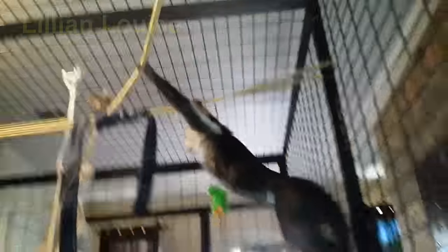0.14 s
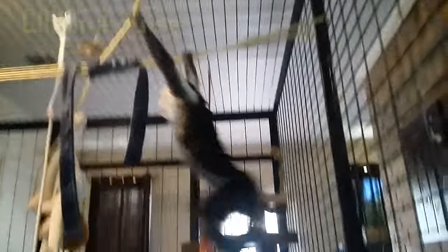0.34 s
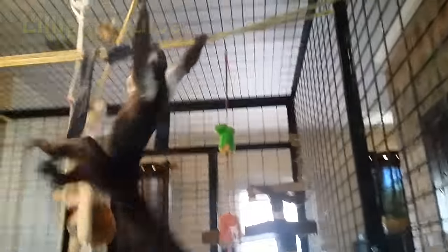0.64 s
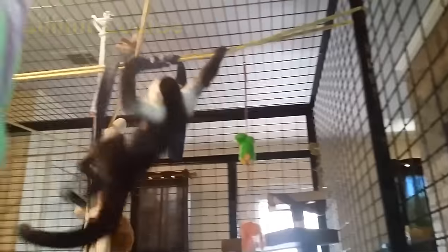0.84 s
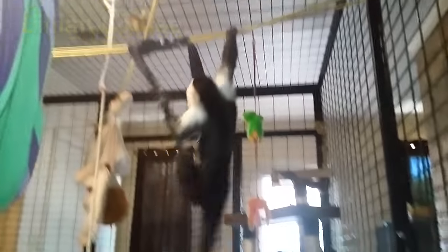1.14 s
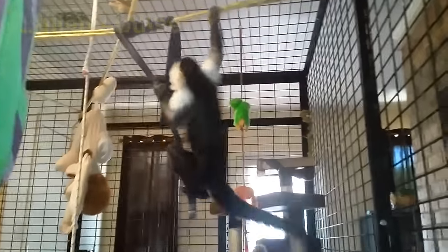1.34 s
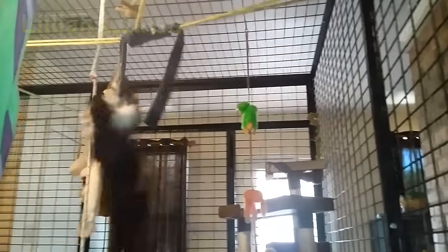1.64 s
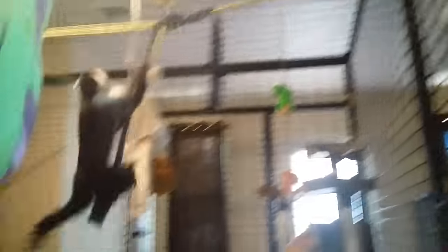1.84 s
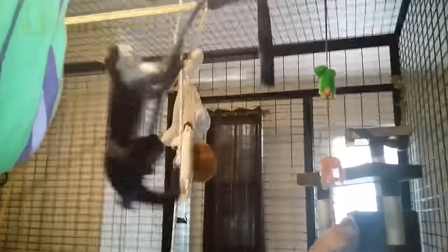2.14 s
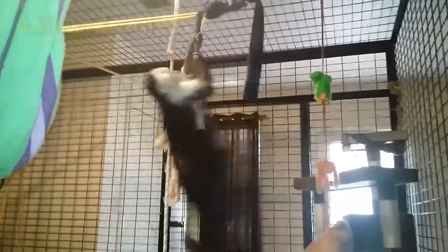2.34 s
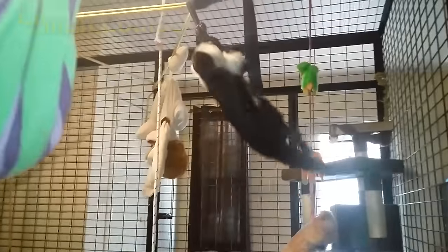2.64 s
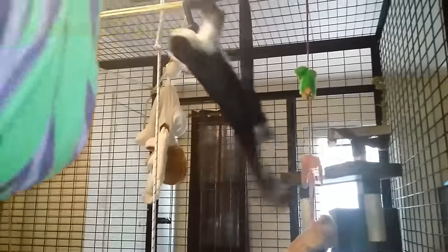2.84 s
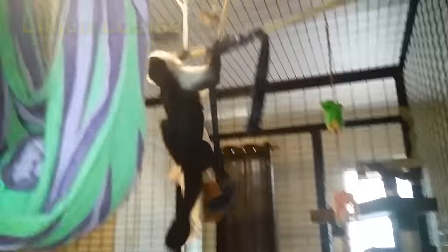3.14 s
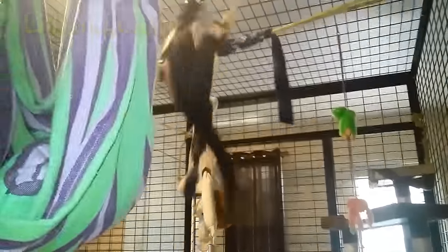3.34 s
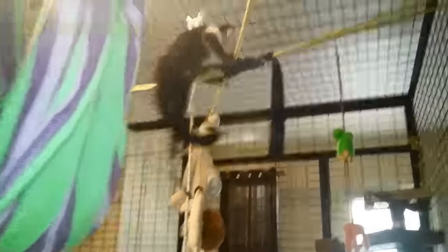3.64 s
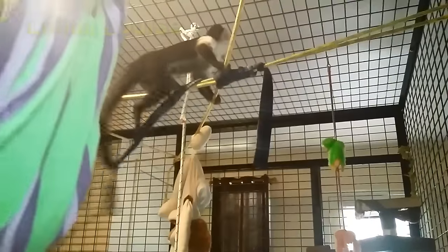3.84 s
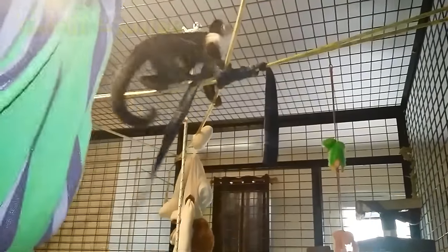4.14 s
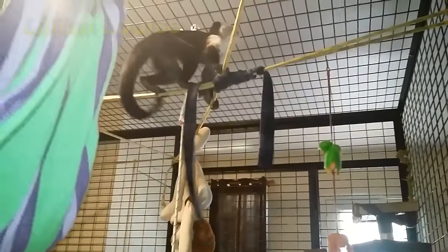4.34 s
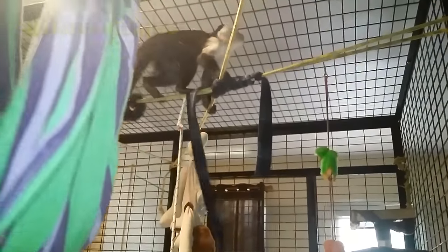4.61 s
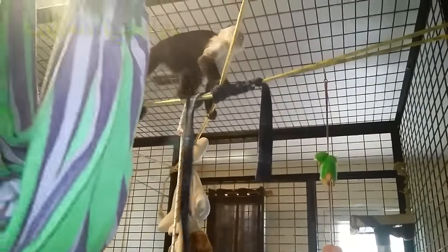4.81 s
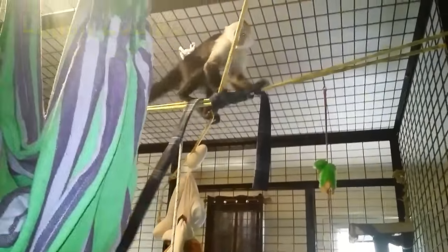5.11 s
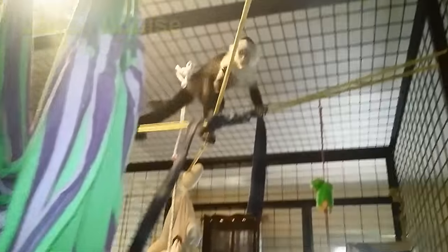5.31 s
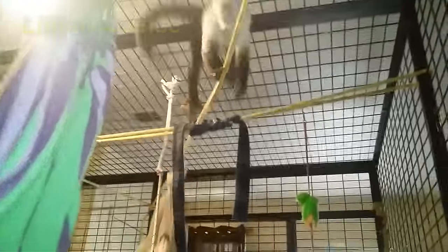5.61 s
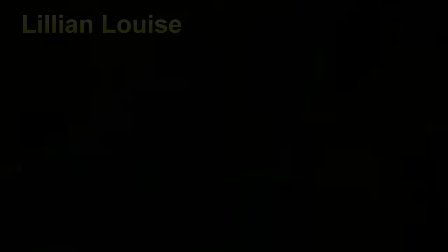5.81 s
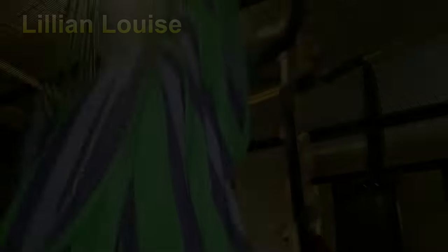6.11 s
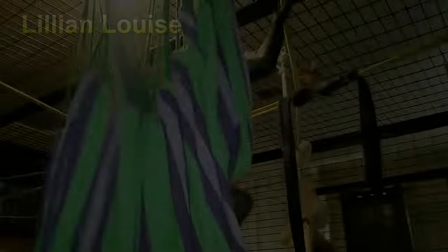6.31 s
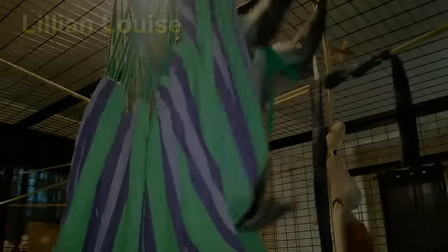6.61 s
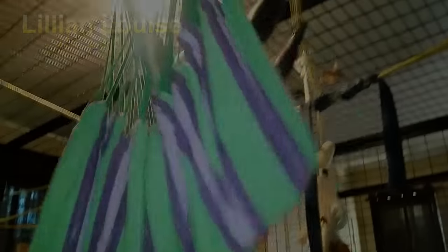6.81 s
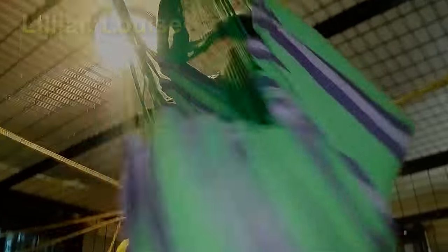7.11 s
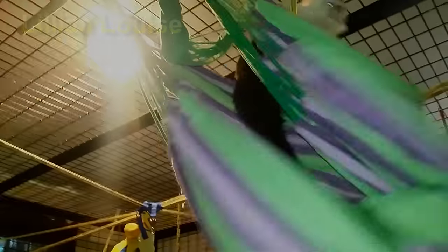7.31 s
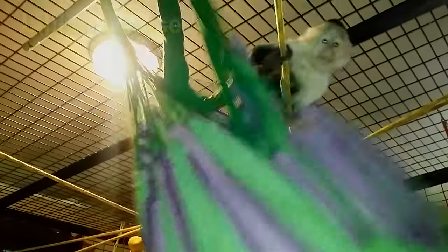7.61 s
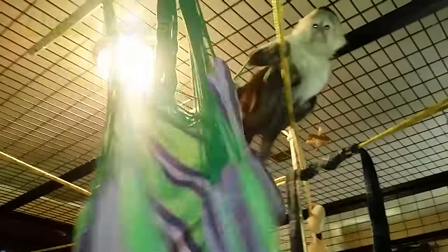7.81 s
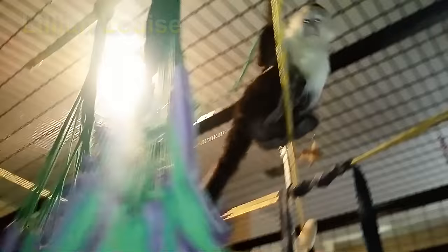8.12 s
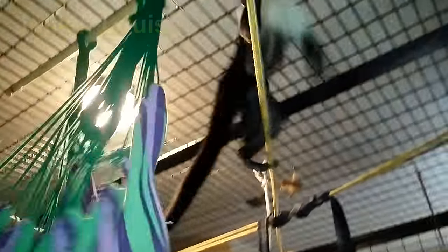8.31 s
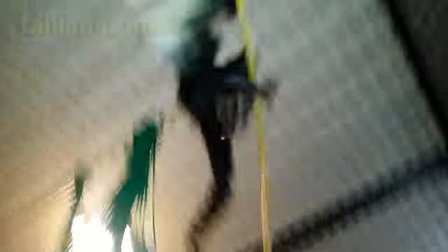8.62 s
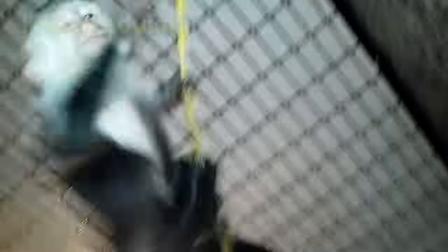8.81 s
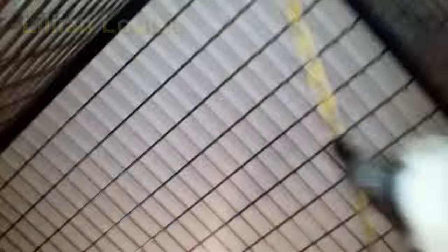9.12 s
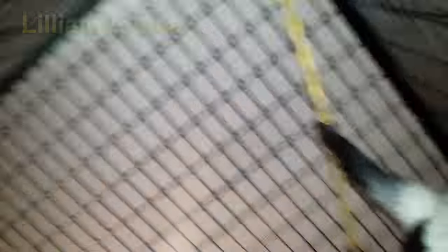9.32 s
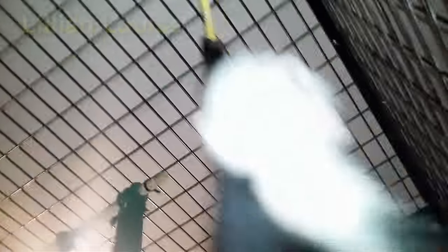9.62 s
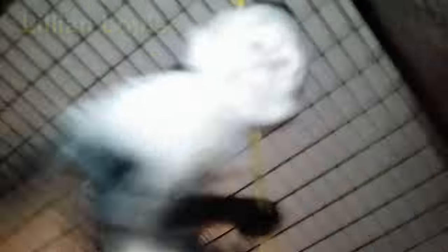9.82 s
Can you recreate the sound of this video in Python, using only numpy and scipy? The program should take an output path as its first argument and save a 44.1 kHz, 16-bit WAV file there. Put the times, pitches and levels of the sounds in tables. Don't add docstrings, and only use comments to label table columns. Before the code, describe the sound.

Over faint low hum in a hard-walled room, a hand-held phone catches a faint snap and a soft brush at 0.1 s. From about 0.65 s a small monkey twitters in short high gliding chirps, with breathy peeps near 1.1 and 1.5 s, while feet scrape mesh. Soft woody thumps cluster from 1.5 to 3.2 s; bright, partly screechy calls peak around 2.4-2.6 s. Quiet peeps lead to the heaviest low thud at 3.75 s. More chirps follow at 4-4.9 s, then hard metallic panel rattles at 5 and 5.6 s. Twittering resumes at 6-6.9 s, peeps and whistles at 7-8.2 s, with a click near 7.7 s. Mesh shakes hard at 8.3 s and more weakly at 8.6 s under a rising peep. Jolts, wire brushes, handling rumble, thumps and a double tick around 9 s precede last chirps and a flurry of snaps at 9.93 s. Short reverberant tails are gated.

```python
import sys
import numpy as np
from scipy import signal
from scipy.io import wavfile
from scipy.ndimage import uniform_filter1d

SR = 44100
rng = np.random.default_rng(int(sys.argv[2]) if len(sys.argv) > 2 else 0)


def inscribe(sig):
    pcm = np.round(np.clip(np.atleast_2d(sig).T, -1, 1) * 32767)
    wavfile.write(sys.argv[1], SR, pcm.astype(np.int16))


def makeup_ratio(level_db):
    decades = np.asarray(level_db, float) / 20
    return 10 ** decades


N = 438787

# t/s, rise/s
SHAKE_STARTS = [(4.99, .04), (5.627, .048), (8.326, .042), (8.625, .07)]
# t/s, f/Hz, width/Hz, relative level/dB
SHAKEN_WIRES = [
    (4.9, 4910, 900, 2.5),
    (5.5, 4130, 1200, -3),
    (8.2, 6440, 1000, 5.5),
]


def rms_one(x):
    return x / np.sqrt(np.mean(x ** 2) + 1e-20)


def in_time(tables):
    t, rows = np.arange(N) / SR, np.concatenate(tables)
    on = np.zeros(N)
    for table in tables:
        start, end = table[0][0], table[-1][0]
        on += np.interp(t, [start - .006, start, end, end + .03], [0, 1, 1, 0])
    return [np.interp(t, rows[:, 0], column) for column in rows.T[1:]] + [on]


def at_hz(points, hz):
    points = np.array(points)
    return np.interp(np.log(hz), np.log(points[:, 0]), points[:, 1])


def drift(hz):
    settle = 9000
    r = np.exp(-2 * np.pi * hz / SR)
    noise = rng.standard_normal(N + settle)
    return rms_one(signal.lfilter([1], [1, -2 * r, r * r], noise)[settle:])


def highpass(x, order, hz):
    return signal.sosfilt(signal.butter(order, hz, "high", fs=SR, output="sos"), x)


def resonate(x, hz, width_hz):
    r = np.exp(-np.pi * width_hz / SR)
    poles = [1, -2 * r * np.cos(2 * np.pi * hz / SR), r * r]
    return signal.lfilter([(1 - r * r) / 2, 0, (r * r - 1) / 2], poles, x + 1e-18)


def through(hits, modes):
    out = 0
    for k, (hz, width, db) in enumerate(modes):
        once = resonate(hits, hz, width)
        out = out + (-1) ** k * makeup_ratio(db) * resonate(once, hz, 1.22 * width)
    return rms_one(out)


def hum():
    # f/Hz, level/dB per Hz
    spectrum = [(26, -28), (37, -23.5), (55, 6), (85, -4.5), (210, -4.5), (300, -8), (500, -12),
                (16000, -30)]
    # f/Hz, coefficient/1
    likeness = [(30, -0.65), (70, -0.64), (260, 0.77), (700, -0.014), (1400, 0.57), (9000, -0.25)]
    out, edges = 0, 22 * 2 ** np.arange(0, 9.6, .5)
    white = rng.standard_normal((2, 2, N))
    for k, (low, high) in enumerate(zip(edges, edges[1:])):
        band = signal.butter(2, [low, high], "band", fs=SR, output="sos")
        mid, side = signal.sosfilt(band, white[k % 2])
        hz = np.sqrt(low * high)
        alike = np.clip(at_hz(likeness, hz), -1, 1)
        stereo = np.sqrt(1 + alike) * mid + np.sqrt(1 - alike) * side * [[1], [-1]]
        out = out + makeup_ratio(at_hz(spectrum, hz)) * stereo
    return rms_one(out)


def jostle():
    # t/s, length/s, level/dB
    movements = [
        (.0, 0.13, -73),
        (2.077, 0.57, -61),
        (4.963, 0.31, -61),
        (7.62, 0.41, -64),
        (8.91, 0.5, -57.5),
        (9.877, 0.037, -61.5),
    ]
    t, swell = np.arange(N) / SR, np.zeros(N)
    for s, length, db in movements:
        swell += makeup_ratio(db) * np.sin(np.pi * np.clip((t - s) / length, 0, 1))
    band = signal.butter(3, [125, 340], "band", fs=SR, output="sos")
    mid, side = signal.sosfilt(band, rng.standard_normal((2, N)))
    return swell * makeup_ratio(4 * drift(14)) * rms_one(mid + .55 * side * [[1], [-1]])


def room(x, direct_db, wet_db):
    t60_s, build_s, port_delay = .24, 0.0021, 16
    t = np.arange(SR // 2) / SR
    tail = rng.standard_normal((2, len(t))) * makeup_ratio(-60 * t / t60_s) * np.minimum(t / build_s, 1)
    tail *= makeup_ratio(wet_db) / np.sqrt(np.sum(tail ** 2, axis=1, keepdims=True))
    tail[0, 0] += makeup_ratio(direct_db)
    tail[1, port_delay] += makeup_ratio(direct_db)
    return signal.fftconvolve(x[None], tail, axes=1)[:, :N]


def thumps():
    # t/s, peak level/dB, pitch f/Hz, knock relative level/dB, knock f/Hz
    blows = [(0.719, -62.5, 225, 0.5, 700), (1.468, -46, 238, -38, 600), (1.713, -48, 156, -9, 920),
             (1.801, -51.5, 150, 0, 990), (1.93, -59, 212, 0, 940), (2.031, -51, 228, -12, 890),
             (2.144, -50, 303, -11, 620), (2.595, -50, 237, -4, 690), (3.088, -51, 312, -12.5, 1010),
             (3.18, -50, 295, -20, 600), (3.736, -34.5, 273.3, -21, 584), (3.757, -28.5, 316.5, -27.5, 890),
             (3.774, -46, 164, -15, 600), (5.27, -65, 227, -1, 887), (5.466, -68, 227.2, 0, 855),
             (7.702, -49, 257, -13, 596), (8.574, -69, 227.6, -3, 1470), (9.001, -44.5, 159, -15, 596),
             (9.207, -46, 383, -5.5, 610), (9.889, -47.5, 167, -20, 600), (9.901, -53, 66, -34, 503)]
    out, t = np.zeros(N + SR), np.arange(SR // 4) / SR
    attack = np.sin(np.minimum(t / 0.004, np.pi / 2)) ** 2
    knocks = rng.standard_normal((len(blows), len(t)))
    for (s, db, hz, knock_db, knock_hz), noise in zip(blows, knocks):
        t60_s = max(.3 + .006 * (db + 47), .03)
        phase = 2 * np.pi * hz * t
        modes = np.sin(phase) + .4 * np.sin(1.08 * phase) + .2 * np.sin(.9 * phase)
        ring = modes * makeup_ratio(-60 * t / t60_s) * attack
        knock = resonate(noise, knock_hz, 0.52 * knock_hz) * makeup_ratio(knock_db + 26.0 - 60 * t / 0.28)
        out[round(s * SR):][:len(t)] += makeup_ratio(db - 6.0) * (ring + knock)
    return out[:N]


def ticks():
    # t/s, peak level/dB
    snaps = [
        (0.0715, -38.5),
        (2.127, -47),
        (3.1802, -49),
        (7.74, -36.5),
        (9.1378, -33),
        (9.1586, -35),
    ]
    # t/s, peak level/dB
    flurry = [
        (9.9315, -28),
        (9.936, -29.5),
        (9.938, -30.5),
    ]
    events = snaps + flurry
    impulses = np.zeros(N)
    impulses[[round(s * SR) for s, _ in events]] = makeup_ratio(np.array(events)[:, 1])
    hit = signal.sosfilt(signal.butter(2, 8500, fs=SR, output="sos"), impulses)
    return 12.0 * (resonate(hit, 4970, 690) - 0.23 * resonate(hit, 7500, 1200) + .5 * resonate(hit, 3240, 380))


def bursts():
    # length/s, peak level/dB, thin wire relative level/dB
    shake_sizes = [(0.28, -22, -6), (0.24, -28, 0.5), (0.23, -23, 1.5), (0.31, -38.5, -9.5)]
    # t/s, rise/s, length/s, peak level/dB, thin wire relative level/dB
    brushes = [
        (0.094, 0.11, 0.093, -62.5, 5),
        (5.962, 0.0029, 0.085, -53, 6),
        (8.872, 0.018, .055, -47, -4.5),
        (9.189, 0.06, 0.095, -40, -3.5),
        (9.282, 0.075, 0.09, -46, 1),
    ]
    # t/s, rise/s, length/s, peak level/dB, dull body relative level/dB
    jolts = [
        (4.739, 0.0034, 0.061, -40.5, 0),
        (8.977, 0.0062, 0.089, -33.5, -8),
    ]
    # t/s, rise/s, length/s, peak level/dB, dull body relative level/dB
    grips = [(1.329, 0.0037, 0.091, -52, 7), (1.701, 0.045, 0.12, -58, 2), (3.322, 0.041, 0.14, -62, 0.5),
             (3.442, 0.018, 0.04, -55, -7), (3.482, 0.063, 0.078, -54, 0), (3.752, 0.015, 0.18, -56.5, 6.5),
             (4.169, 0.014, 0.035, -52.5, 7), (4.44, 0.13, 0.3, -60, 7.5),
             (6.371, 0.0073, 0.063, -48.5, -9), (6.493, 0.059, 0.029, -61, 2), (6.797, 0.054, 0.11, -56, 0)]
    # t/s, rise/s, length/s, peak level/dB, dull body relative level/dB
    scrambles = [(1.802, 0.011, 0.2, -64, 10.5), (1.44, 0.027, 0.3, -64, -1.5),
                 (2.001, 0.076, 0.12, -70.5, 17), (2.35, 0.025, 0.12, -58.5, 7), (0.683, .02, 0.23, -61, 1),
                 (0.96, .03, 0.38, -58.5, -9), (3.977, 0.018, .2, -62, 3), (4.358, .01, 0.065, -63, 4),
                 (6.058, .03, 0.26, -57, -9), (6.998, 0.021, 0.12, -62, -0.5),
                 (5.262, 0.0066, 0.18, -64.5, 4), (5.414, 0.062, 0.1, -81, 21.5),
                 (7.092, 0.023, 0.2, -68, 6.5), (7.291, 0.078, 0.16, -64, 6),
                 (7.594, 0.072, 0.51, -65, 11.5), (8.554, 0.1, 0.042, -57.5, 8.5),
                 (9.871, 0.024, 0.039, -54.5, -7)]
    shakes = [start + size for start, size in zip(SHAKE_STARTS, shake_sizes)]
    kinds = [(shakes, (21, 58, -10.5, -25, 15, -18), True),
             (brushes, (8.5, 17, -6.5, -10, 14, -0.5), True),
             (jolts, (8.5, 25.5, -12.5, -30, -0.5, -11.5), False),
             (grips, (4.5, 23.5, -8.5, -56, -1, -10), False),
             (scrambles, (6.5, 5.5, -6, -39.5, -2, -14), False)]
    out = []
    for rows, (onset_db, fall_db, other_db, hiss_db, tail_db, air_db), bright in kinds:
        for s, rise, length, db, rel_db in rows:
            thin_db, body_db = (rel_db, other_db) if bright else (other_db, rel_db)
            fizz_db = hiss_db + 0.61 * (thin_db - other_db)
            high = (fizz_db, fizz_db + air_db)
            end = s + max(length, rise + 0.0035)
            out.append([(s, db - onset_db, thin_db, body_db + 0.43 * tail_db, *high),
                        (s + rise, db, thin_db, body_db, *high),
                        (end, db - fall_db, thin_db, body_db + tail_db, *high)])
    return out


def contact_gains():
    gains, t = np.zeros((5, N)), np.arange(N) / SR
    for rows in bursts():
        s, level_db, *rel_db = np.transpose(rows)
        span = slice(round((s[0] - .003) * SR), round((s[-1] + 0.044) * SR))
        edge = np.interp(t[span], [s[0] - .003, s[0], s[-1], s[-1] + .03], [0, 1, 1, 0])
        gains[:, span] += [edge * makeup_ratio(np.interp(t[span], s, level_db + db)) for db in [0, *rel_db]]
    return uniform_filter1d(gains, size=120, axis=1)


def rattle():
    # f/Hz, width/Hz, level/dB
    mesh_modes = [(3700, 740, 9.5), (4530, 1200, 7)]
    # f/Hz, width/Hz, level/dB
    thin_modes = [(5680, 1060, -7.5), (6660, 1570, -12.5)]
    # f/Hz, width/Hz, level/dB
    body_modes = [(864, 570, -6), (1350, 520, -13.5), (1950, 760, 10.5), (2900, 850, 4.5)]
    t = np.arange(N) / SR
    mesh, thin, body, fine, airy = contact_gains()
    strength = makeup_ratio(4.54 * np.minimum(rng.exponential(1, N), 5))
    hits = (rng.random(N) < 5000 / SR) * strength * rng.choice([-1, 1], N)
    hiss = rms_one(highpass(resonate(hits, 9200, 2900), 3, 8000))
    air = rms_one(highpass(rng.standard_normal(N), 2, 10500))
    loudest, shaking = np.zeros(N), np.zeros(N)
    for s, hz, width, db in SHAKEN_WIRES:
        during = abs(t - s - .2) < .2
        loudest += makeup_ratio(db) * during * through(hits, [(hz, width, 0)])
        shaking += during
    low_db = -16 - 4 * shaking
    frame = through(hits, body_modes[2:]) + makeup_ratio(low_db) * through(hits, body_modes[:2])
    wires = mesh * (through(hits, mesh_modes) + loudest) + thin * through(hits, thin_modes)
    return wires + body * frame + fine * hiss, airy * air


def peep(rows, change_db, overtone_db):
    # multiple/1, level/dB
    overtones = [(2, -6), (3, -7), (4, -10), (5, -19)]
    tables = []
    for s, length, start_hz, end_hz, db in rows:
        tables.append([(s, start_hz, db - change_db / 2), (s + length, end_hz, db + change_db / 2)])
    hz, level_db, on = in_time(tables)
    phase = 2 * np.pi * np.cumsum(hz * (1 + 0.011 * drift(30) + 0.015 * drift(225))) / SR
    tone = np.sin(phase)
    for k, db in overtones:
        tone += makeup_ratio(db + overtone_db + 2.5 * drift(10)) * np.sin(k * phase)
    breath = makeup_ratio(level_db + 6.5 + 3.2 * drift(47)) * (1 + .48 * drift(800))
    return on * breath * tone


def peeps():
    # t/s, length/s, start f/Hz, end f/Hz, level/dB
    low_peeps = [(1.14, 0.17, 892, 1100, -63), (3.21, 0.079, 994, 960, -69), (3.34, 0.11, 980, 1059, -69),
                 (3.52, 0.069, 965, 930, -64), (3.63, 0.12, 960, 1000, -81), (5.49, 0.11, 1067, 1037, -68),
                 (7.14, 0.087, 986.5, 947, -64.5), (7.54, 0.081, 1035, 1072, -62),
                 (7.72, 0.095, 994, 1040, -61)]
    # t/s, length/s, start f/Hz, end f/Hz, level/dB
    high_peeps = [
        (1.49, 0.1, 1350, 1284, -60.5),
        (7.01, 0.1134, 1217, 1293, -61.5),
        (7.38, 0.13, 1219, 1507, -59.5),
    ]
    # t/s, length/s, start f/Hz, end f/Hz, level/dB
    long_glide = [
        (8.56, .32, 810, 1880, -59.5),
    ]
    return (peep(low_peeps, change_db=-3.5, overtone_db=-4) + peep(high_peeps, change_db=-1, overtone_db=-10)
            + peep(long_glide, change_db=11, overtone_db=-17))


def twitter(rows, wobble, rough, pulse_db, second_db, third_db):
    out, jitter = np.zeros(N), 1 + wobble * drift(80.5) + rough * drift(300)
    broken = rms_one(makeup_ratio(pulse_db * drift(45)) * (1 + .35 * drift(600)))
    for s, length, hz, db, slide in rows:
        span = slice(round(s * SR), round((s + length) * SR))
        u = np.linspace(0, 1, span.stop - span.start)
        pitch = hz * (1 + slide * (u - .5)) * jitter[span] / jitter[span].mean()
        phase = 2 * np.pi * np.cumsum(pitch) / SR
        shape = np.sin(np.pi * u) ** 0.12
        tone = np.sin(phase) + makeup_ratio(second_db) * np.sin(2 * phase) + makeup_ratio(third_db) * np.sin(3 * phase)
        out[span] += makeup_ratio(db + 7.5) * shape * rms_one(broken[span]) * tone
    return out


def notes():
    # t/s, length/s, mid f/Hz, level/dB
    rises = [(0.715, 0.083, 2500, -47.5), (0.783, 0.035, 2965, -44), (1.133, 0.044, 2350, -54),
             (1.409, 0.057, 1083, -63), (1.789, 0.03, 1910, -53), (2.494, 0.057, 3202, -39.5),
             (4, 0.068, 2834, -55.5), (4.385, 0.05, 2096, -56.5), (4.506, 0.075, 3020, -54),
             (4.653, 0.071, 1729, -58.5), (4.776, 0.11, 1880, -53.5), (4.891, 0.058, 2303, -58),
             (6.03, 0.029, 2350, -59), (6.037, 0.026, 3140, -54.5), (6.127, 0.11, 2626, -51.5),
             (6.499, 0.11, 1633, -67.5), (6.83, 0.022, 3630, -45.5), (7.844, 0.067, 2254, -66),
             (8.085, 0.048, 3920, -44.5), (8.128, 0.04, 2570, -45.5), (8.193, 0.074, 3202, -40.5),
             (8.215, 0.12, 2370, -47), (8.88, 0.061, 2200, -51.5), (9.035, 0.071, 2300, -52.5),
             (9.333, 0.05, 3146, -37.5)]
    # t/s, mid f/Hz, level/dB
    falls = [(.83, 2286, -46.5), (.98, 4133, -52), (1.02, 2800, -55), (1.075, 2120, -55.5),
             (2.012, 1230, -59.5), (2.448, 2510, -43.5), (2.455, 1803, -52.5), (2.565, 2424, -41),
             (2.6, 2900, -70), (6.719, 2320, -73), (7.639, 3230, -57), (4.034, 2223, -50.5),
             (4.455, 1950, -54), (6.856, 2414, -59.5), (7.716, 2414, -56)]
    # t/s, f/Hz, level/dB
    chips = [(.657, 2044, -58), (0.672, 3902, -40), (0.71, 4600, -53.5), (.945, 4610, -48.5),
             (1.149, 1830, -56), (1.714, 2360, -76), (2.104, 3690, -48.5), (2.215, 2195, -48.5),
             (2.223, 2600, -53.5), (2.388, 4040, -41.5), (2.43, 4880, -44), (4.084, 1775, -54),
             (4.925, 1914, -52), (6.065, 3800, -53), (6.104, 3780, -42.5), (6.17, 3030, -47),
             (6.769, 2005, -58.5), (6.78, 3830, -51.5), (7.661, 2760, -56), (7.699, 3160, -47),
             (7.758, 3830, -53.5), (8.072, 3280, -56), (8.112, 4440, -63), (9.218, 4100, -44.5),
             (9.247, 4700, -42.5), (9.271, 2422, -46.5), (9.286, 3160, -41), (9.358, 2700, -42.5)]
    # t/s, length/s, mid f/Hz, level/dB
    holds = [(0.115, 0.2, 769, -76), (1.217, 0.096, 2074, -57), (3.974, 0.049, 3510, -59),
             (4.1, .07, 1706, -62.5), (2.098, 0.064, 4150, -53), (2.164, 0.022, 2950, -50),
             (2.2, .035, 3050, -53), (2.136, 0.065, 3640, -60), (6.053, 0.053, 4170, -55),
             (6.135, .05, 3750, -66), (6.217, .04, 3274, -50), (2.276, 0.079, 1824, -50.5),
             (2.385, 0.065, 2686, -46.5), (4.54, 0.06, 1480, -60), (4.545, 0.094, 1880, -54.5),
             (4.513, 0.16, 2425, -58.5), (5.374, 0.043, 1950, -53), (6.245, 0.063, 2734, -48.5),
             (6.281, 0.089, 2158, -51), (6.584, 0.14, 3446, -55.5), (6.626, 0.1, 2990, -60),
             (6.696, 0.071, 2520, -59), (7.572, 0.062, 3700, -48.5), (7.76, 0.15, 1861, -52),
             (7.904, 0.063, 1820, -52), (8.933, 0.11, 1664, -56.5), (9.08, 0.11, 1710, -58),
             (9.362, 0.1, 2243, -45)]
    fall_s, chip_cycles = .052, 100.0
    rising = [(*row, 0.158) for row in rises]
    falling = [(s, fall_s, hz, db, -0.181) for s, hz, db in falls]
    chipping = [(s, chip_cycles / hz, hz, db, 0.035) for s, hz, db in chips]
    sagging = [(*row, -0.033) for row in holds]
    return rising + falling + chipping + sagging


def glides(rows):
    return [(s, length, (a + b) / 2, db, 2 * (b - a) / (a + b)) for s, length, a, b, db in rows]


def monkey():
    # t/s, length/s, start f/Hz, end f/Hz, level/dB
    screeches = [(.84, 0.085, 2900, 2000, -53.5), (1.09, 0.063, 2300, 1722, -52),
                 (2.37, 0.048, 2126, 2500, -50.5), (2.44, 0.048, 2185, 2900, -53),
                 (2.53, 0.066, 2705, 2515, -42), (2.6, 0.062, 3300, 2900, -63),
                 (4.46, 0.099, 3760, 3500, -58), (4.5, 0.13, 1500, 1383, -67),
                 (4.55, 0.074, 2710, 3084, -55.5), (4.62, 0.068, 1450, 1620, -73),
                 (6.13, 0.07, 2300, 2900, -61), (5.42, 0.045, 1350, 850, -61),
                 (5.56, 0.12, 1388, 1600, -58), (1.465, 0.082, 1650, 1900, -58),
                 (1.58, 0.12, 1605, 1900, -60), (2.04, .07, 4285, 4150, -56.5),
                 (2.19, 0.058, 4300, 4350, -60.5), (8.9, 0.13, 1900, 1652, -57.5),
                 (9.04, 0.16, 1800, 1605, -56.5), (2.225, 0.0498, 2650, 2460, -57),
                 (.645, .05, 2800, 3140, -60.5), (6.3, 0.079, 2800, 2750, -60),
                 (6.83, 0.051, 3580, 2900, -58), (7.304, 0.036, 3746, 3600, -51.5),
                 (1.19, .12, 2017, 2288, -61), (7.66, 0.094, 3250, 2099, -58),
                 (7.85, .08, 2000, 2700, -57.5), (9.3, 0.12, 2757, 2630, -48.5)]
    # t/s, length/s, start f/Hz, end f/Hz, level/dB
    strands = [(0.806, 0.029, 3286, 3235, -40), (.85, 0.056, 2600, 2067, -52.5),
               (0.982, 0.029, 4304, 4230, -50.5), (1.03, 0.07, 5430, 5700, -68),
               (1.078, 0.038, 3900, 4150, -59), (1.155, 0.039, 1792, 1757, -46.5),
               (1.158, 0.057, 3640, 3600, -63), (1.219, 0.055, 2350, 2480, -56.5),
               (1.23, 0.083, 3970, 4090, -64.5), (1.715, 0.018, 2400, 2330, -60.5),
               (1.776, .06, 3030, 2950, -75), (2.117, 0.017, 4180, 4320, -47),
               (2.156, 0.016, 4340, 4200, -48.5), (2.42, 0.079, 1900, 1826, -53),
               (2.465, 0.038, 3200, 3080, -44), (2.52, 0.052, 1806, 1920, -59),
               (2.557, 0.044, 2290, 2243, -48), (2.566, 0.048, 3400, 3250, -48),
               (2.632, 0.056, 2900, 2300, -62), (4.558, 0.057, 2940, 2990, -60),
               (7.39, 0.032, 2560, 2650, -66), (7.395, 0.103, 4030, 4370, -62),
               (7.41, 0.0504, 5440, 5600, -72), (7.99, 0.14, 1707, 1802, -63),
               (8.105, .07, 4520, 4550, -51), (8.21, 0.039, 3460, 3320, -47.5),
               (6.42, 0.048, 1303, 1300, -67.5), (6.51, 0.042, 5520, 5170, -64),
               (7.301, 0.0193, 800, 950, -60), (7.583, 0.02, 3750, 3813, -44.5),
               (7.619, 0.06, 3647, 3477, -47.5), (7.655, 0.044, 2700, 2480, -59),
               (7.761, 0.0226, 4100, 4090, -64), (7.907, 0.013, 3400, 3230, -60),
               (7.918, 0.031, 960, 880, -63), (7.947, 0.1, 1700, 1493, -63.5),
               (1.496, 0.077, 4040, 3950, -63.5), (1.561, 0.028, 1315, 1306, -58),
             (3.495, .03, 1960, 1890, -55.5), (3.53, 0.057, 1930, 1900, -66), (3.643, .04, 1950, 1983, -72),
             (3.68, 0.034, 3950, 4070, -68), (3.747, .06, 1930, 1936, -58.5),
             (3.798, 0.036, 2245, 2210, -77), (4.574, 0.045, 1388, 1434, -66.5),
             (8.243, 0.052, 3500, 3425, -55), (7.156, 0.13, 2000, 2130, -71),
             (7.463, 0.093, 1640, 2263, -56.5), (7.545, 0.026, 3100, 2980, -52)]
    calls = twitter(notes(), wobble=.03, rough=.024, pulse_db=4.5, second_db=-28, third_db=-36)
    calls += twitter(glides(screeches), wobble=.05, rough=.07, pulse_db=5.5, second_db=-28, third_db=-38)
    calls += twitter(glides(strands), wobble=.018, rough=.016, pulse_db=4, second_db=-25, third_db=-36)
    return calls + peeps()


def scene():
    # t/s, left minus right level/dB
    pan = [(0.0, 1), (0.08, -24), (0.22, -12.5), (0.27, -2), (0.77, -4.5), (5.82, -5), (5.93, -3),
           (5.96, -12), (6.12, 1.5), (6.23, -3.5), (6.76, -1.5), (8.31, -3), (8.37, -3), (8.59, -3),
           (9.64, -4), (9.89, -3), (9.92, -6), (9.95, -21)]
    pan_db, _ = in_time([pan])
    wires, fizz = rattle()
    far = room(monkey(), direct_db=-5.5, wet_db=0.0) + room(wires, direct_db=-4, wet_db=-1.5)
    low = thumps()
    near = low + fizz + ticks() + room(low, direct_db=-30, wet_db=-11)
    moving = (far + near) * makeup_ratio([pan_db / 2, -pan_db / 2])
    hum_db, left_db = -59, -3.5
    return moving + jostle() + makeup_ratio(hum_db) * hum() * makeup_ratio([[left_db / 2], [-left_db / 2]])


def gate(x, open_db, slope, depth_db, shut_db_per_s):
    treble = highpass(x, 2, 800)
    level_db = 10 * np.log10(uniform_filter1d(np.mean(treble ** 2, axis=0), size=1500) + 1e-12)
    wanted = np.clip(slope * (level_db - open_db), -depth_db, 0)
    ramp = shut_db_per_s * np.arange(N) / SR
    gain_db = np.maximum.accumulate(wanted + ramp) - ramp
    return x * makeup_ratio(uniform_filter1d(gain_db, size=300))


def band_limit(x):
    return signal.sosfilt(signal.butter(12, 16310, fs=SR, output="sos"), x)


def record(dry):
    rolled = highpass(dry, 2, 48)
    gated = gate(rolled, open_db=-52.5, slope=0.8, depth_db=7.0, shut_db_per_s=253)
    cut = signal.sosfilt(signal.cheby2(22, 50, 16400, fs=SR, output="sos"), gated)
    return band_limit(cut)


dry = scene()
out = record(dry)
inscribe(out)
```